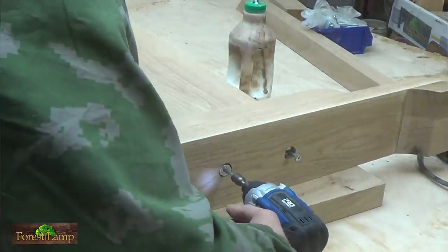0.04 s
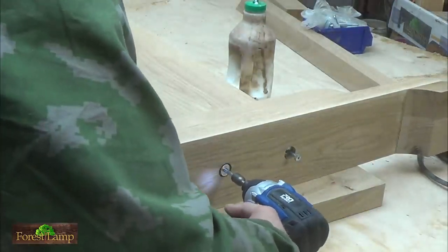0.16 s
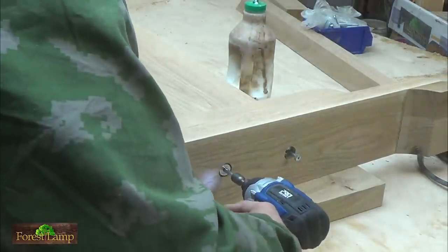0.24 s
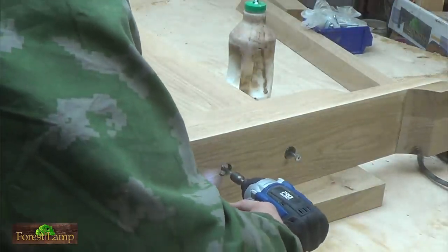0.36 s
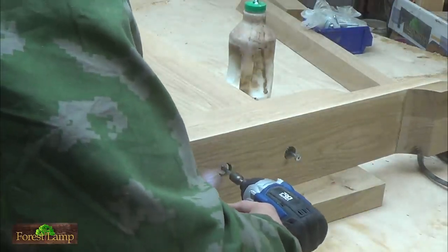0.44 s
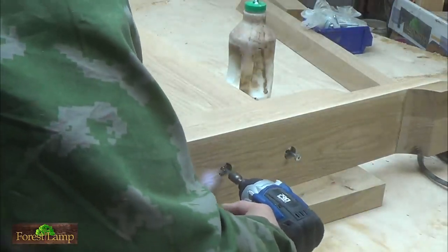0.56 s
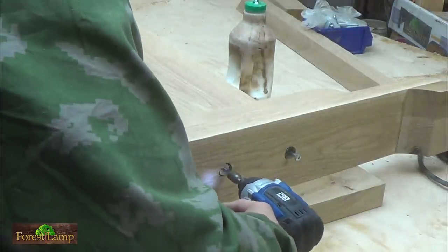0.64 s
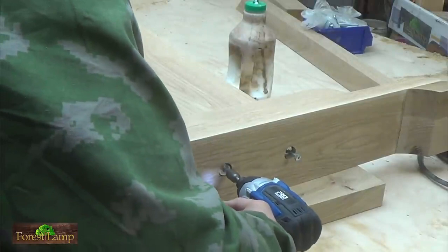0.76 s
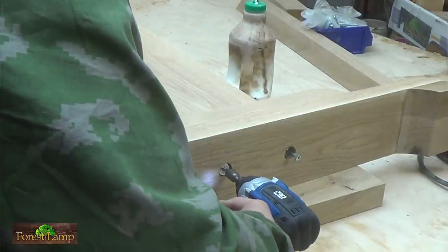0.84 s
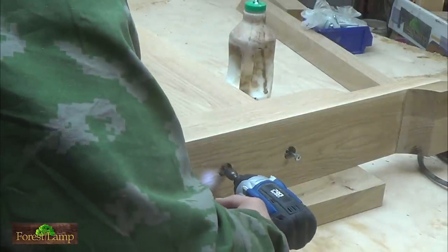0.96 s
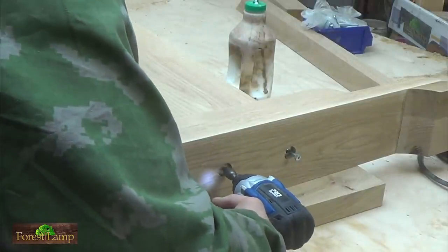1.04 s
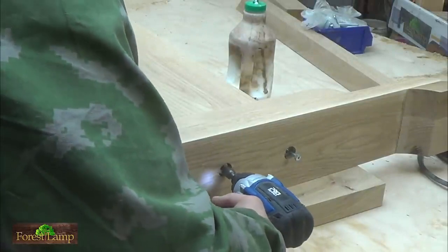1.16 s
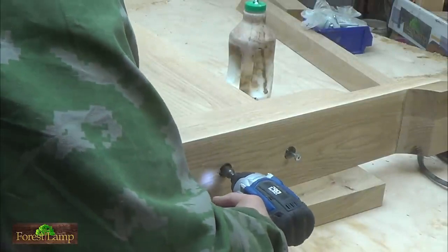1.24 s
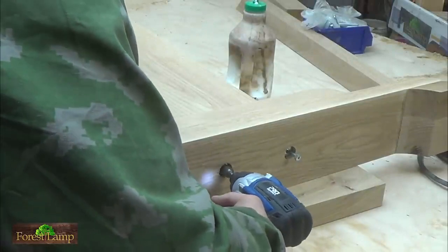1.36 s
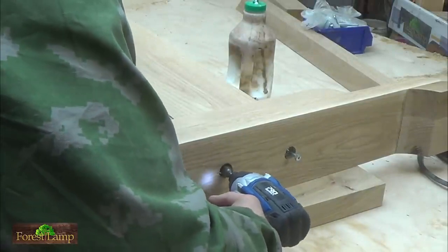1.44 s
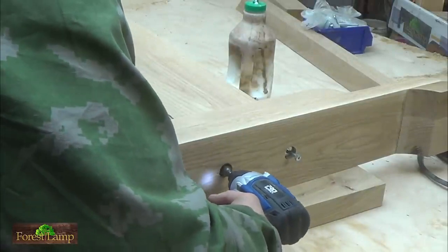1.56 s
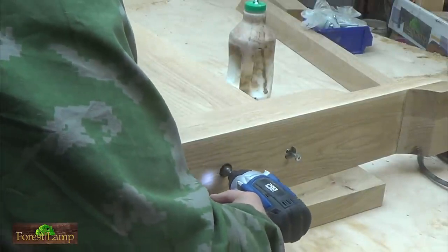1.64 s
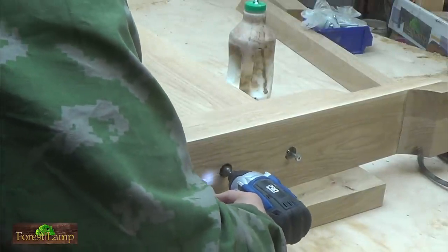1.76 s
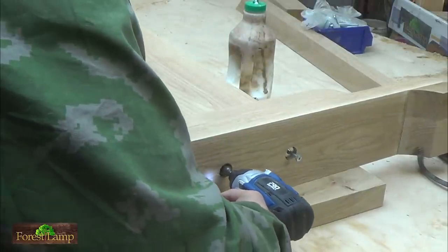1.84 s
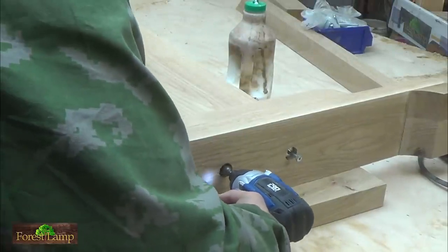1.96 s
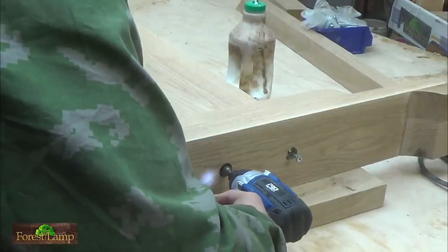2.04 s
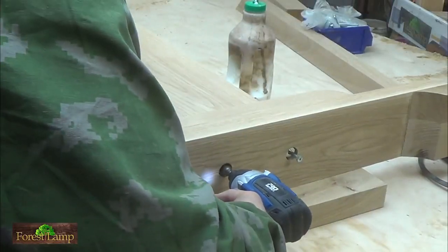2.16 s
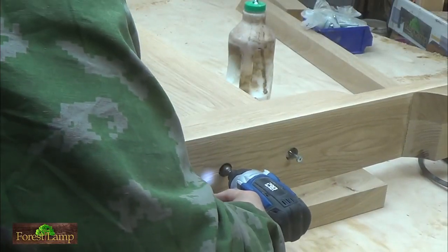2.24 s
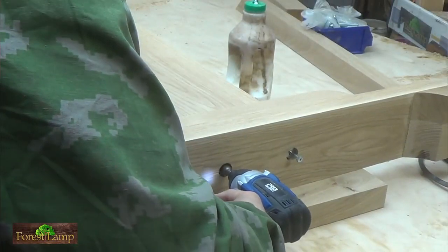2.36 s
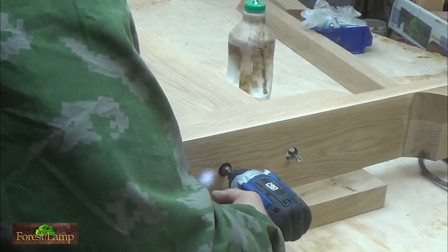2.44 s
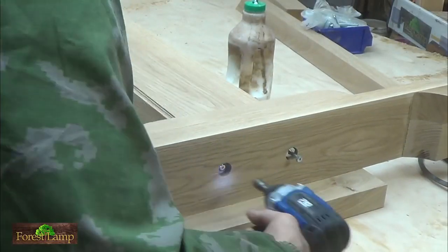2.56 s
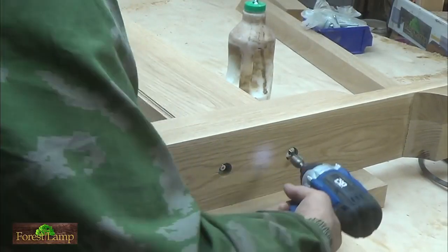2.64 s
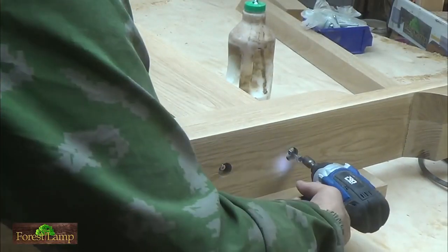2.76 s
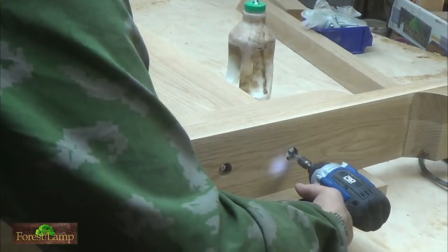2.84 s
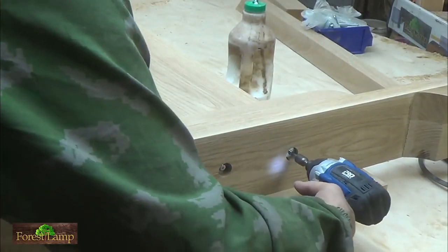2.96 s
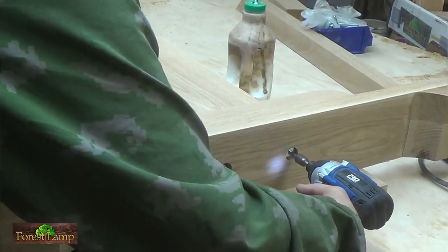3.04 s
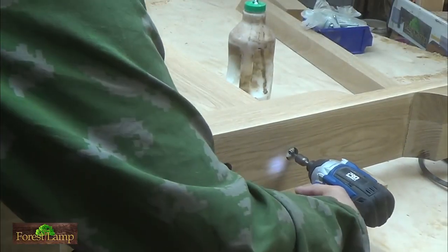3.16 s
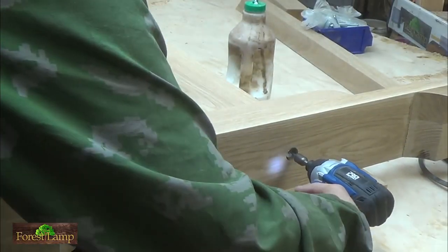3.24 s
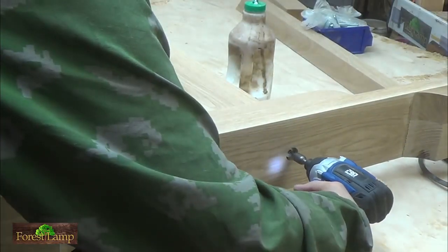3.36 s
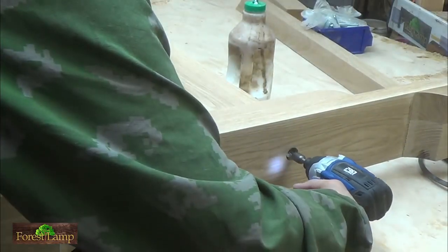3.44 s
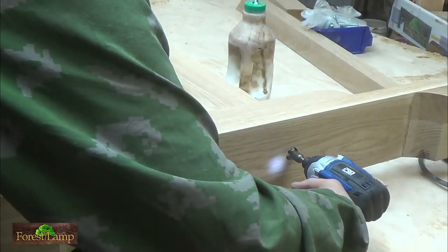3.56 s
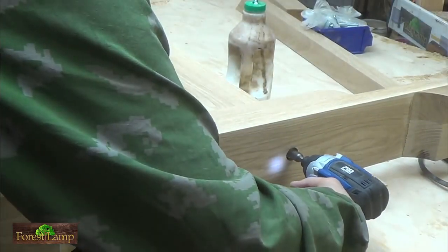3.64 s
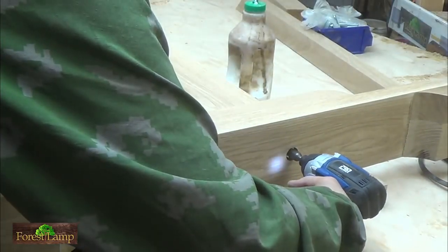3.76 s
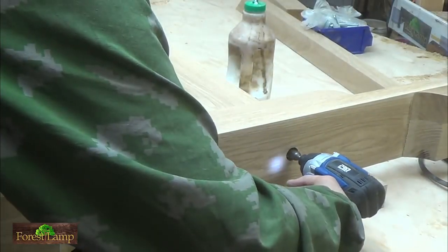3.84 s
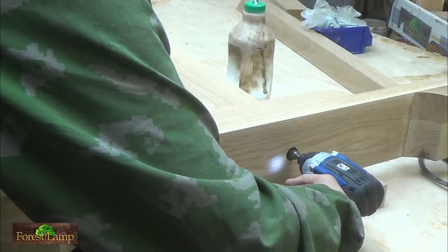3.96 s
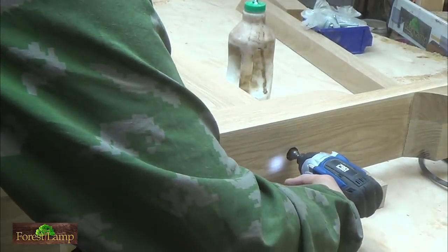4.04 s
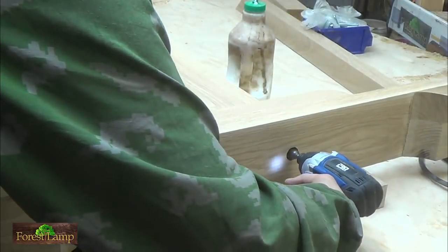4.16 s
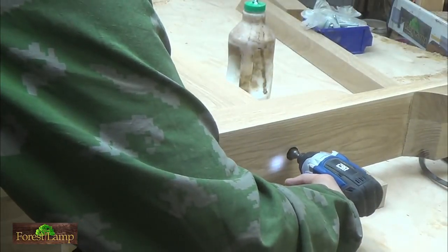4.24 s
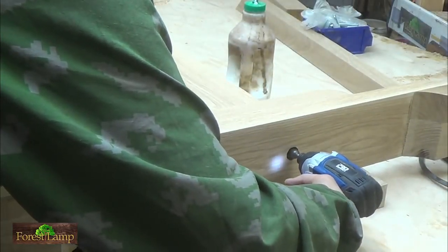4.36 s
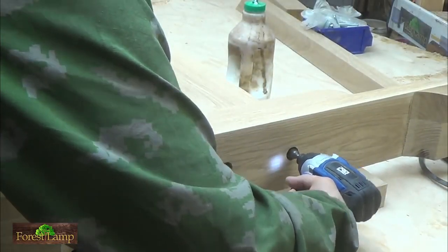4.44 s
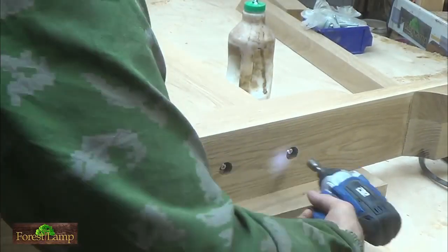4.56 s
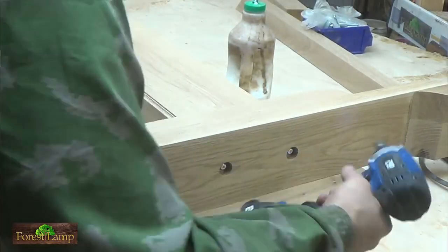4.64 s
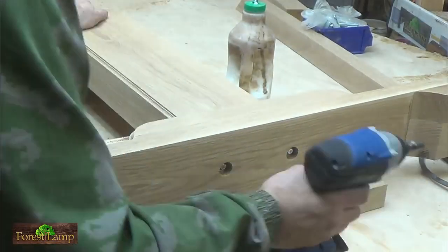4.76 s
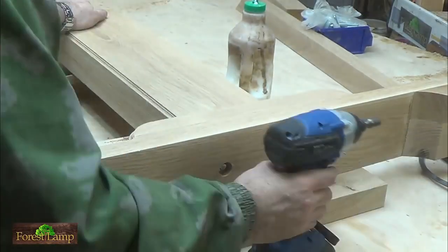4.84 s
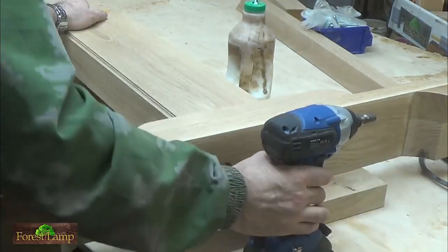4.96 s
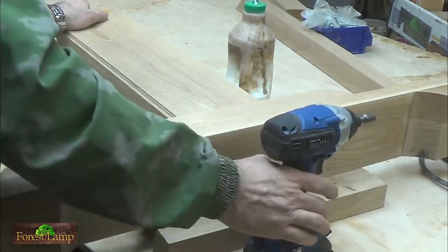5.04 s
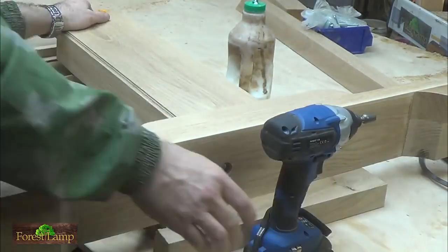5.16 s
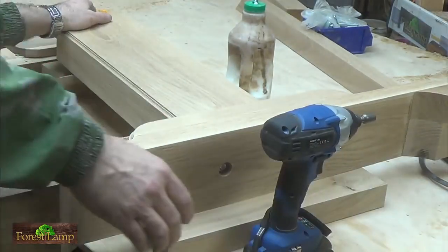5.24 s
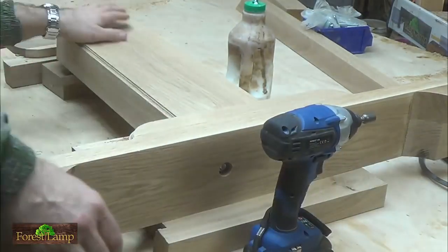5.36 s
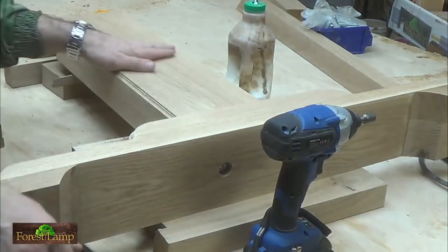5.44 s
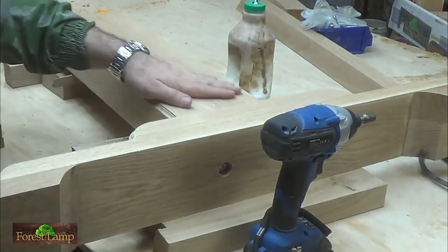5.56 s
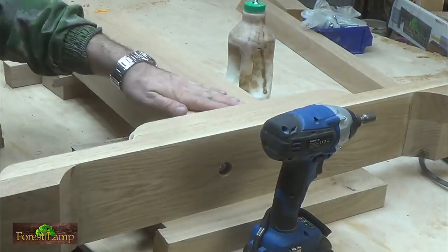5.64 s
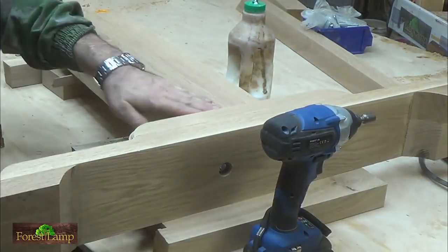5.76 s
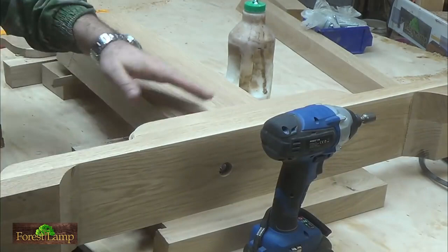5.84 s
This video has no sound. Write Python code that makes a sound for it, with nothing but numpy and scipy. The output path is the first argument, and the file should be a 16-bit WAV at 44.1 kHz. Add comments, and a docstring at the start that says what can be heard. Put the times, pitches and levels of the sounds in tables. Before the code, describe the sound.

The tail of a driver pull coasts out, then a long rattling impact run begins at once, its metallic ringing rising as the bolt tightens. It stops; small taps of bit on wood follow, then a second, shorter hammering run. Finally loud wooden clunks as the tool is put down, then quiet, grainy rubbing of a palm. Close miked in a small workshop with low hum.

```python
"""In a faintly humming workshop a cordless impact driver coasts out of a pull, then sinks two bolts into a wooden frame.
Gear rasp is coloured noise, the motor a wandering hum; hammer blows crack as clicks and noise bursts on the anvil.
Bit, bolt and frame ring along as narrow noise resonances, most of them rising as each bolt seats.
Wood knocks come before, between and after the bolts as the bit and tool touch down, the heaviest on the bench.
At the end a hand slides over the wood: swells of grainy hiss."""
import sys
import numpy as np
from scipy import signal
from scipy.fft import rfft, irfft, next_fast_len
from scipy.io import wavfile

SR = 44100
rng = np.random.default_rng(int(sys.argv[2]) if len(sys.argv) > 2 else 0)


def unload_audio(sound):
    """Save the sound as a 16-bit wav file, at the path given as the first command line argument."""
    columns = np.transpose(np.atleast_2d(sound))
    # keep every value between -1 and 1, then stretch to whole-number steps
    steps = np.round(np.clip(columns, -1, 1) * 32767)
    wavfile.write(sys.argv[1], SR, steps.astype(np.int16))


def voltage_ratio(decibels):
    """Convert decibels (scalar or array-like) to amplitude ratios, 20 dB per decade."""
    exponent = np.asarray(decibels, float) / 20
    return 10 ** exponent


N = 260631
T = np.arange(N) / SR

# Pulls of the trigger. Each row: motor takes hold in seconds, trigger released in seconds, level in dB.
PULLS = [(-1., -.005, 0.5), (.25, 2.458, 0), (3.156, 4.462, 0.5)]
# Colour of a hard, bright contact. Each row: frequency in Hz, level in dB.
CRACK_COLOUR = [(800, -49), (2500, -16), (4000, 8.5), (7000, -1.5), (8500, -5.5), (11500, 1), (15500, -9.5)]


def rms_one(x):
    """Scale to an rms of 1."""
    return x / np.sqrt(np.mean(x ** 2) + 1e-20)


def coloured(x, points):
    """Filter by a (Hz, dB) table read on a log frequency axis."""
    size = next_fast_len(N)
    hz = np.maximum(np.arange(size // 2 + 1) * SR / size, 1)
    table_hz, table_db = np.transpose(points)
    gain = voltage_ratio(np.interp(np.log(hz), np.log(table_hz), table_db))
    return irfft(rfft(x, size) * gain, size)[..., :N]


def noise(points, channels=1):
    """Coloured noise of rms 1."""
    return rms_one(coloured(rng.standard_normal((channels, N)), points))


def dying(x, seconds):
    """Each impulse dies away exponentially with the given time constant."""
    return signal.lfilter([1], [1, -np.exp(-1 / (seconds * SR))], x + 1e-18)


def flicker(rate_hz):
    """Random wander of rms 1: noise smoothed twice."""
    smoothing_s = 1 / (2 * np.pi * rate_hz)
    return rms_one(dying(dying(rng.standard_normal(N), smoothing_s), smoothing_s))


def resonance(drive, hz, width_hz, even=0):
    """A resonance whose centre may move: shift down, low-pass, shift back; even > 0 steadies its swing; rms 1."""
    turn = np.exp(2j * np.pi * np.cumsum(hz * np.ones(N)) / SR)
    ring_s = 1 / (np.pi * width_hz)
    swing = dying(dying(drive / turn, ring_s), .25 * ring_s)      # the second pass steepens the skirts
    return rms_one((swing * turn).real / (np.abs(swing) + 1e-9) ** np.clip(even, 0, 1))


def swell(peak_s, rise_s, fall_s):
    """A smooth bump of height 1."""
    return np.exp(-((T - peak_s) / np.where(T < peak_s, rise_s, fall_s)) ** 2)


def shop():
    """Wide rumble with a few humming bands and one thin steady whine near the top of hearing."""
    # Level of the rumble over time. Each row: time in seconds, level in dB.
    level_points = [(0.0, -57), (0.22, -65), (2.56, -70), (2.75, -68), (3.12, -65), (4.58, -67.5),
                    (4.95, -65), (5.91, -59)]
    # Colour of the rumble. Each row: frequency in Hz, level in dB.
    rumble_colour = [(15, -45.5), (25, -11), (69, -25), (106, -11.5), (131, -2.5), (286, -5), (326, -20),
                     (354, -6), (501, -9), (879, -11), (1120, -5), (1350, -12.5), (1860, -13.5),
                     (2630, -17.5), (15000, -45.5)]
    # Humming bands. Each row: centre in Hz, width in Hz, level in dB relative to the rumble.
    hum_bands = [(107, 31, -3.5), (309, 61, -2.5), (959, 110, -10)]
    whine_hz, whine_rms_db = 15622, -80.5
    s, level_db = np.transpose(level_points)
    mid, side = noise(rumble_colour, channels=2)
    hum = sum(voltage_ratio(hum_db) * resonance(rng.standard_normal(N), hz, width_hz) for hz, width_hz, hum_db in hum_bands)
    wide = mid + hum + voltage_ratio(-13) * side * np.array([[1], [-1]])
    whine = voltage_ratio(whine_rms_db) * np.sqrt(2) * np.sin(2 * np.pi * whine_hz * T)
    return voltage_ratio(np.interp(T, s, level_db)) * wide + whine


def trigger_db():
    """Motor level: every pull spins up steeply, settles over its last decibels, holds and coasts to rest."""
    spin_up_db_per_s, settle_db, settle_s = 1496, -5, 0.02
    coast_db, coast_s, coast_bend = -35, .08, 1.3      # falls by coast_db at coast_s, ever more steeply
    pulls_db = []
    for start, release, level_db in PULLS:
        spin_up = spin_up_db_per_s * np.minimum(T - start, 0)
        settle = settle_db * np.exp(-np.maximum(T - start, 0) / settle_s)
        coast = coast_db * (np.maximum(T - release, 0) / coast_s) ** coast_bend
        pulls_db.append(level_db + spin_up + settle + coast)
    return np.max(pulls_db, axis=0)


def by_stage(bolt, starting, free, biting, seated):
    """A quantity that moves as the bolt runs free, bites and seats; the opening pull ends on a seated bolt."""
    # Progress of each bolt. Each row: bites at, bite takes, seats at, seating takes, all in seconds.
    bolts = [(1.4, .3, 2.26, .12), (4.042, .02, 4.205, .07)]
    bites, bite_s, seats, seat_s = bolts[bolt]
    s = [PULLS[bolt + 1][0], bites, bites + bite_s, seats, seats + seat_s]
    return np.where(T < PULLS[1][0] / 2, seated, np.interp(T, s, [starting, free, biting, biting, seated]))


def on_second_bolt():
    """True from midway between the release of the first bolt's pull and the start of the second's."""
    return T > (PULLS[1][1] + PULLS[2][0]) / 2


def over_both_bolts(stages):
    """Follow the first bolt's stages, then the second's."""
    first, second = stages
    return np.where(on_second_bolt(), by_stage(1, *second), by_stage(0, *first))


def motor_turns():
    """The turning motor: a narrow, fairly even resonance of rms 1 whose pitch wanders."""
    turns_hz, wander_hz = 238.6, 4.6
    return resonance(rng.standard_normal(N), turns_hz + wander_hz * flicker(2), width_hz=8., even=.75)


def gear_rasp(turns):
    """Gear teeth grinding: flickering coloured noise that swells with the motor's turns."""
    # Colour of the rasp on the first and on the second bolt. Each row: frequency in Hz, level in dB.
    first_colour = [(35, -61.5), (60, -32.5), (238, -8), (492, -12.5), (566, -6.5), (822, -13),
                    (1170, -5.5), (1470, -7), (1780, -13), (2090, -10), (2470, -12), (3120, -11),
                    (12100, -25.5), (16000, -33.5)]
    second_colour = [(35, -57), (60, -58), (193, -6.5), (233, -2), (371, -12.5), (636, -5), (803, -8.5),
                     (903, -2), (1010, -5.5), (1860, -9), (3120, -7.5), (8120, -18.5), (11800, -20),
                     (16000, -26)]
    # One row a bolt: level in dB when starting, just before the bite, biting and seated.
    stages_db = [(-36.2, -36.5, -37.5, -37), (-36, -34.5, -36, -37)]
    rasp = np.where(on_second_bolt(), noise(second_colour)[0], noise(first_colour)[0])
    rasp = rasp * (1 + 0.13 * turns)      # the gears bite harder once a turn
    wander_db = .4 * flicker(11) + 2.76 * flicker(100)
    return voltage_ratio(over_both_bolts(stages_db) + wander_db) * rasp


def motor_hum(turns):
    """The motor's hum under load, with a groan as the second bolt pulls tight."""
    # One row a bolt: level in dB when starting, just before the bite, biting and seated.
    stages_db = [(-48.5, -54, -52, -62), (-45, -45.5, -55, -54)]
    # The groan: its peak in seconds, level in dB, half length in seconds.
    groan_s, groan_db, half_s = (4.295, -40.5, 0.021)
    groan = voltage_ratio(groan_db) * swell(groan_s, half_s, half_s)
    return (voltage_ratio(over_both_bolts(stages_db) + 1.1 * flicker(2.4)) + groan) * turns


def rumble():
    """Low wandering noise, with a kick as the tool jerks in the hand when the motor takes hold."""
    # Colour of the rumble. Each row: frequency in Hz, level in dB.
    colour = [(40, -26.5), (70, -10), (120, 5), (170, 12.5), (260, -37)]
    # One row a bolt: level in dB when starting, just before the bite, biting and seated.
    stages_db = [(-74, -71, -57.5, -71), (-60.5, -57.5, -57.5, -71.5)]
    kick_db, kick_s = -49, 0.024
    kick = sum(voltage_ratio(kick_db) * swell(start + kick_s, kick_s, kick_s) for start, _, _ in PULLS)
    return (voltage_ratio(over_both_bolts(stages_db) + 3. * flicker(2.3)) + kick) * noise(colour)[0]


def hammer(running):
    """Hard blows; while the motor runs, glancing ones keep the hammer's beat in the gaps, over a faint rattle."""
    # The hard blows. Each row: time in seconds, impulse strength in dB.
    hard_blows = [(0.2469, -30), (0.3162, -21.5), (0.4028, -21), (0.4783, -24), (0.589, -21), (0.6398, -21),
                  (0.661, -19.5), (0.6803, -28), (0.7088, -23), (0.9448, -21.5), (0.9966, -23.5),
                  (1.0137, -23.5), (1.04, -21), (1.0769, -22.5), (1.1776, -21.5), (1.2018, -22),
                  (1.3065, -21.5), (1.3436, -22.5), (1.3606, -19.5), (1.491, -19.5), (1.5285, -19),
                  (1.5509, -24.5), (1.5753, -19), (1.6718, -27), (1.711, -23.5), (1.733, -22.5),
                  (1.7814, -21), (1.8651, -24), (1.8871, -25), (1.9098, -25), (1.9619, -26), (1.9873, -28),
                  (2.0256, -24.5), (2.0451, -24.5), (2.0632, -23.5), (2.0924, -24.5), (2.1648, -22.5),
                  (2.2358, -24.5), (2.2614, -25), (2.2956, -26.5), (2.363, -25), (2.3872, -27.5),
                  (2.4323, -28), (2.464, -26), (3.1575, -30), (3.1878, -21), (3.2347, -25), (3.294, -23),
                  (3.3868, -22.5), (3.4187, -27.5), (3.4414, -25.5), (3.5232, -23.5), (3.5425, -22),
                  (3.5654, -20), (3.6222, -23.5), (3.6612, -23), (3.6902, -23.5), (3.7957, -27.5),
                  (3.918, -26), (4.1018, -24.5), (4.1296, -22.5), (4.1523, -23.5), (4.2352, -24),
                  (4.2645, -20.5), (4.3584, -21.5), (4.372, -26), (4.3922, -25), (4.4285, -20),
                  (4.456, -28.5)]
    beats_per_s, jitter_s = 46., .002
    glancing_db, glancing_spread_db = -26, -2.5
    rattles_per_s, rattle_db = 120., -42      # rattle_db is the weakest rattle
    rattle_strength = voltage_ratio(rattle_db + 3.0 * np.minimum(rng.exponential(1, N), 3))
    train = (rng.random(N) < rattles_per_s / SR) * rattle_strength
    chance = rng.standard_normal((N, 2))
    for (s, _), (following, _) in zip(hard_blows, hard_blows[1:]):
        steps = max(round((following - s) * beats_per_s), 1)
        for beat in np.linspace(s, following, steps + 1)[1:-1]:
            late, weakness = chance[round(beat * SR)]
            strength_db = glancing_db + glancing_spread_db * np.clip(weakness, -3, 1.5)
            train[round((beat + jitter_s * late) * SR)] = voltage_ratio(strength_db)
    train = train * running
    for s, strength_db in hard_blows:
        train[round(s * SR)] = voltage_ratio(strength_db)
    return train


def cracks(blows):
    """Each blow and its rebound click and burst out in every band of the anvil with a strength of their own."""
    # Edges of the anvil's neighbouring bands in Hz.
    band_edges = [900, 2600, 4600, 8000, 12500, 16000]
    rebound_s, rebound_db = .0043, -9.5
    struck = blows + voltage_ratio(rebound_db) * np.roll(blows, round(rebound_s * SR))
    hiss, out = noise(CRACK_COLOUR)[0], 0
    for low, high in zip(band_edges, band_edges[1:]):
        strengths = struck * voltage_ratio(1.4 * np.clip(rng.standard_normal(N), -2, 2))
        band = signal.butter(2, [low, high], "band", fs=SR, output="sos")
        fading = 0.95 * dying(strengths, 0.00092) + 0.26 * dying(strengths, 0.0054)
        burst = signal.sosfilt(band, hiss) * fading
        click = signal.sosfilt(band, coloured(strengths, CRACK_COLOUR))
        out = out + burst + click
    return out


def rings(blows):
    """Bit, bolt and frame resonate to noise that each blow drives harder for a moment; pitches move on seating."""
    # One list a bolt. Each row: frequency in Hz, frequency when seated in Hz, width in Hz,
    # then level in dB when starting, just before the bite, biting and seated.
    rings_by_bolt = [
        [(574, 840, 41, -62.5, -50, -43.5, -65), (973, 1200, 84, -58, -50.5, -47, -45.5),
         (1171, 1268, 34.7, -35, -37.5, -36.5, -38), (1454, 1575, 29, -41.5, -40.5, -36.5, -38.5),
         (2085, 2089, 15, -43.5, -44.5, -45.5, -45), (2330, 2356, 210, -52, -69, -55, -48),
         (3100, 3181, 260, -47, -48, -63, -50)],
        [(570, 730, 29, -72, -61, -44.5, -63), (707, 706, 30, -75.5, -65, -63, -44.5),
         (908, 970, 74, -46.5, -55, -48.5, -46), (1301, 1560, 44, -52.5, -60, -36, -43.5),
         (2100, 2089, 17, -65, -66, -46.5, -56), (2410, 2356, 40, -71, -72.5, -55, -48),
         (2690, 2591, 120, -71, -82, -59, -47), (3110, 3181, 240, -48.5, -51.5, -58, -62)],
    ]
    # Brief dips of the rings. Each row: time in seconds, depth in dB, half length in seconds.
    dips = [(1.026, -9.5, 0.028)]
    build_s, start_db = 0.02, -12      # the rings take a moment to build after each start
    shaking = 1 + 55.0 * dying(blows, 0.0049)
    build_db = sum(start_db * swell(start, build_s, build_s) for start, _, _ in PULLS)
    dip_db = sum(depth_db * swell(s, half_s, half_s) for s, depth_db, half_s in dips)
    second, out = on_second_bolt(), 0
    for bolt, modes in enumerate(rings_by_bolt):
        for hz, seated_hz, width_hz, *stage_db in modes:
            level_db = by_stage(bolt, *stage_db) + build_db + dip_db + 1.1 * flicker(7.5)
            moving_hz = by_stage(bolt, hz, hz, hz, seated_hz)
            ring = resonance(shaking * rng.standard_normal(N), moving_hz, width_hz, even=.4)
            out = out + (second == bolt) * voltage_ratio(level_db) * ring
    return out


def squeal():
    """A thin squeal, one narrow resonance, as the motor takes hold."""
    # Each row: peak in seconds, level in dB.
    squeals = [(.24, -56), (3.14, -68)]
    strokes = sum(voltage_ratio(level_db) * swell(s, .016, 0.0069) for s, level_db in squeals)
    return strokes * resonance(rng.standard_normal(N), hz=3140, width_hz=90.)


def driver():
    """The whole tool: gears, motor and rings follow the trigger; cracks and squeals come on top."""
    running = voltage_ratio(trigger_db())
    turns = motor_turns()
    blows = hammer(running)
    body = gear_rasp(turns) + motor_hum(turns) + rumble() + rings(blows)
    return running * body + cracks(blows) + squeal()


def knocks():
    """A rough contact swells and rings the wood modes, with a dull thud around them and a bright tick on top."""
    # Bit and tool touching wood. Each row: time in seconds, strength in dB, tick relative to it in dB,
    # thud relative to it in dB, contact time constant in milliseconds.
    contacts = [(0.224, -70, 14.5, -12, 13), (2.534, -63.5, -12, 14, 4.4), (2.76, -62.5, -6, 3.5, 7.9),
                (2.932, -55.5, -3, -5, 3.2), (2.965, -53, -11, -11, 3.6), (2.991, -41, -6.5, -5, 3.9),
                (3.118, -67.5, 9, 7, 16), (4.574, -60, 1.5, 11.5, 5.9), (4.755, -28, -17.5, -6, 6.3),
                (4.792, -38.5, -24, -5, 3.7), (4.831, -64.5, 3, -12, 8.4), (4.886, -40, -34, -1.5, 1.8),
                (4.903, -38, -29, -7.5, 7.5), (5.072, -61.5, -1, -3, 12), (5.693, -59, 8, 2, 3.9)]
    # Wood modes. Each row: frequency in Hz, relative level in dB, time to fall by 60 dB in seconds.
    wood_modes = [(330, -12, .06), (445, -6, .07), (505, 0, .085), (610, -9, .055), (694, -8, .055),
                  (856, -8, .05), (1050, -10, .045), (1281, -12, .035)]
    # Colour of the thud. Each row: frequency in Hz, level in dB.
    thud_colour = [(150, -13.5), (400, -2.5), (900, 1.5), (1500, -1), (2600, -10), (4500, -28), (9000, -35)]
    push, tick, thud = np.zeros((3, N))
    for s, strength_db, tick_db, thud_db, contact_ms in contacts:
        fading = 1000 * np.maximum(T - s, 0) / contact_ms
        rising = 1 - np.exp(-3.0 * fading)
        push += voltage_ratio(strength_db) * rising * np.exp(-fading) * 1000 / (SR * contact_ms)
        tick += voltage_ratio(strength_db + tick_db) * (1 - np.exp(-9.0 * fading)) * np.exp(-1.4 * fading)
        thud += voltage_ratio(strength_db + thud_db) * rising * np.exp(-.6 * fading)
    out = tick * noise(CRACK_COLOUR)[0] + thud * noise(thud_colour)[0]
    modes = 0
    for hz, level_db, t60_s in wood_modes:
        swing = dying(push, t60_s / np.log(1000))      # the contact feeds the mode, which then dies away
        mode = resonance(rng.standard_normal(N), hz, width_hz=52.0, even=0.76)
        modes = modes + voltage_ratio(level_db) * swing * mode
    return out + voltage_ratio(-2.0) * modes


def hand():
    """Skin and sleeve sliding over planed wood: a slightly grainy hiss."""
    # Strokes of the hand. Each row: loudest at in seconds, level in dB, rise in seconds, fall in seconds.
    slides = [(5.085, -75, 0.061, .04), (5.56, -64.5, .15, 0.11), (5.8, -70, .06, 0.09)]
    # Colour of the hiss. Each row: frequency in Hz, level in dB.
    hiss_colour = [(1470, -33), (2500, -10.5), (2970, -0.5), (3690, -9), (5350, -5), (7650, -10),
                   (11400, 0), (13200, -4), (16000, -9)]
    strokes = sum(voltage_ratio(level_db) * swell(s, rise_s, fall_s) for s, level_db, rise_s, fall_s in slides)
    grain = voltage_ratio(1.5 * flicker(40))
    return strokes * grain * noise(hiss_colour)[0]


def walls(x):
    """Dull diffuse echoes, exponentially fading noise that is unrelated at the two sides."""
    # Colour of the echoes. Each row: frequency in Hz, level in dB.
    echo_colour = [(30, -5.5), (200, 2.5), (700, -4), (1200, 0), (2000, 1.5), (3500, 4.5), (6000, 0.5),
                   (9000, -2), (16000, -27)]
    t60_s, first_echo_s = 0.16, .003
    t = T[:SR // 3]
    echoes = rng.standard_normal((2, len(t))) * voltage_ratio(-60 * t / t60_s) * (t > first_echo_s)
    echoes = echoes / np.sqrt(np.sum(echoes ** 2, axis=1, keepdims=True))
    return signal.fftconvolve(coloured(x, echo_colour)[None], echoes, axes=1)[:, :N]


def microphones(x):
    """The two close ports differ a little in level and phase from band to band."""
    # Left level over right. Each row: frequency in Hz, difference in dB.
    left_over_right = [(60, -5), (125, -2.8), (250, -2), (500, 1.4), (1000, .6), (2000, -.8), (4000, -.9),
                       (8000, 0), (16000, 0)]
    # Phase by which left leads right. Each row: frequency in Hz, lead in radians.
    left_leads = [(0, 0), (260, -0.6), (1030, -0.46), (2760, -0.4), (3450, -0.0), (15800, 0.0)]
    size = next_fast_len(N)
    log_hz = np.log(np.maximum(np.arange(size // 2 + 1) * SR / size, 1))
    level_hz, level_db = np.transpose(left_over_right)
    lead_hz, lead_rad = np.transpose(left_leads)
    level = np.interp(log_hz, np.log(level_hz), level_db)
    lead = np.interp(log_hz, np.log(lead_hz), lead_rad)
    half = voltage_ratio(level / 2) * np.exp(.5j * lead)      # half the difference goes to each side
    return irfft(rfft(x, size) * np.array([half, 1 / half]), size)[:, :N]


def scene():
    """Tool, knocks and hand reach the two ports directly and by the walls, over the shop's hum."""
    near = driver() + knocks() + hand()
    return microphones(near) + voltage_ratio(-11.5) * walls(near) + shop()


def low_pass(x):
    """Removes everything above the highest recorded frequency."""
    return signal.sosfilt(signal.butter(12, 16250, fs=SR, output="sos"), x)


def record(dry):
    """Peaks are rounded softly and the top is cut steeply."""
    overload, top_hz = .2, 16250      # overload is the full-scale fraction that rounded peaks approach
    rounded = overload * np.tanh(dry / overload)
    mix = signal.sosfilt(signal.cheby2(16, 60, top_hz, fs=SR, output="sos"), rounded)
    return low_pass(mix)


dry = scene()
out = record(dry)
unload_audio(out)
```